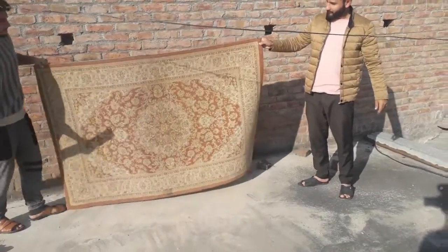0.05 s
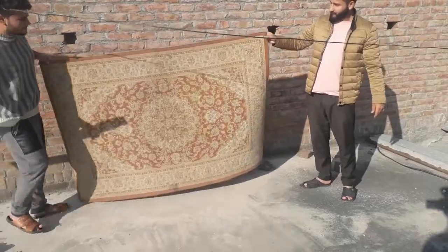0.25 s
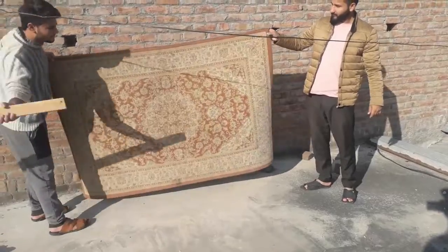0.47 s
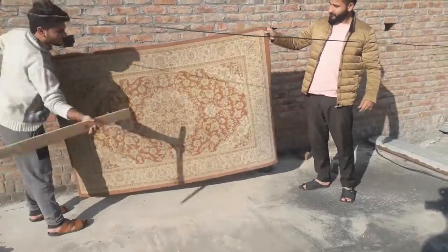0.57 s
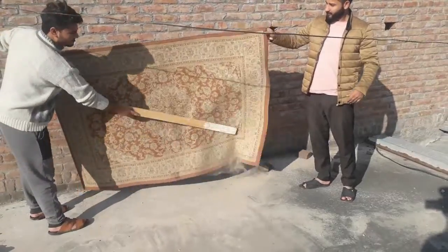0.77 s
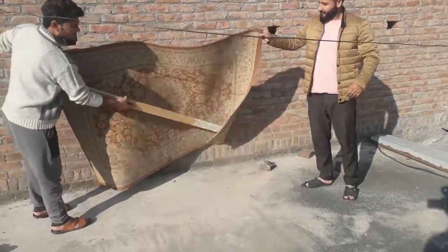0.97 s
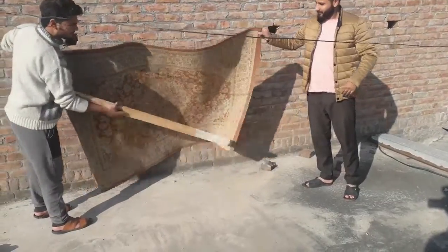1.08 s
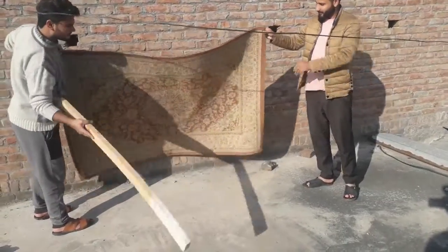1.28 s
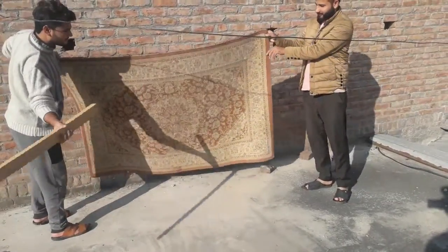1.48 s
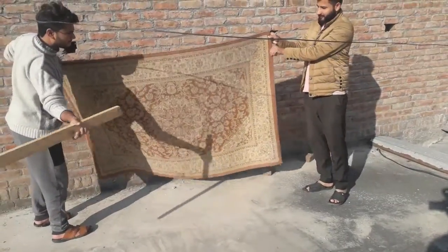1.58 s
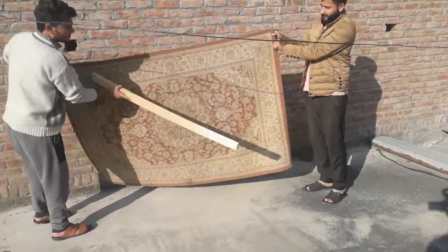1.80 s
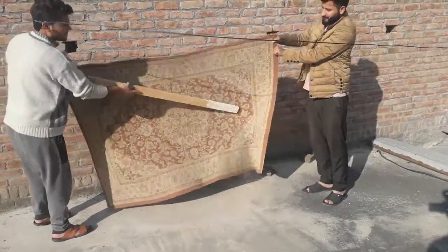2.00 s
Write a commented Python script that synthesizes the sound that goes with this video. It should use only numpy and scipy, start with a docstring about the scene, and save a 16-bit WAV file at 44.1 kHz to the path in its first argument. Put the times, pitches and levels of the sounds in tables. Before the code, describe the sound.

Two heavy, thumping slaps of a bat on a rug echo briefly in a yard.

```python
"""Two loud slaps, each on a dull thump: a wooden bat beats a hanging rug in a brick-walled yard.
Just before each blow a sandal scuffs and the bat swishes through the air, very faintly the second time.
The harder first blow sets the rug's folds clapping. Ground and walls throw each blow back and the yard
booms low. In between, rug and clothes rustle over quiet air. A limiter trims the loudest peaks."""
import sys
import numpy as np
from scipy import signal
from scipy.fft import rfft, irfft, next_fast_len
from scipy.io import wavfile
from scipy.ndimage import uniform_filter1d, minimum_filter1d, map_coordinates

SR = 44100
rng = np.random.default_rng(int(sys.argv[2]) if len(sys.argv) > 2 else 0)


def output_pcm(signal):
    """Save a mono or channel-first signal as 16-bit PCM at the path in sys.argv[1].

    Samples are clipped to [-1, 1] before scaling.
    """
    pcm = np.clip(np.atleast_2d(signal).T, -1, 1) * 32767
    wavfile.write(sys.argv[1], SR, np.round(pcm).astype(np.int16))


N = 90404
T = np.arange(N) / SR


def amp(db):
    """Turn decibels into a number to multiply by."""
    return 10 ** (np.asarray(db) / 20)


def along(points, hz):
    """Read the value at hz from (frequency, value) points, on a log frequency axis."""
    freqs, values = np.transpose(points)
    return np.interp(np.log(hz + 1), np.log(freqs + 1), values)


def filtered(x, gain):
    """Turn each frequency in x up or down by gain(hz)."""
    size = next_fast_len(N + 8192)
    return irfft(rfft(x, size) * gain(np.fft.rfftfreq(size, 1 / SR)), size)[:N]


def noise(colour, tilt_db=0):
    """Noise of average power 1, shaped by a colour table and tilted by tilt_db per octave."""
    white = rng.standard_normal(N)
    shaped = filtered(white, lambda hz: amp(along(colour, hz) + tilt_db * np.log2(hz + 20)))
    return shaped / np.sqrt(np.mean(shaped ** 2) + 1e-20)


def wobble(rate):
    """A smooth curve through `rate` random points a second."""
    points = rng.standard_normal(int(N * rate / SR) + 4)
    return map_coordinates(points, [np.arange(N) * rate / SR])


def fade(t, fade_s):
    """Stay at 1 until t = 0, then drop 60 dB every fade_s seconds."""
    return np.exp(-np.log(1000) * np.maximum(t, 0) / fade_s)


def swell(peak_s, rise_s, fade_s):
    """A level that grows until peak_s and then dies away."""
    return np.exp(np.minimum(T - peak_s, 0) / rise_s) * fade(T - peak_s, fade_s)


def delayed(x, delay_s):
    """The same sound, delay_s seconds later."""
    return np.pad(x, (max(round(delay_s * SR), 0), 0))[:N]


def ringing(tones):
    """Add up pure tones that each die away at their own speed."""
    return sum(amp(db) * np.sin(2 * np.pi * hz * T) * fade(T, fade_s) for hz, db, fade_s in tones)


def far_tone():
    """A faint, wavering tone far away sinks in pitch and fades."""
    # the tone's path: time_s, pitch_hz, level_db
    path = [(0, 913, -48.5), (.1, 897, -55.5), (.6, 901.5, -64.5), (.74, 871, -65), (.85, 860, -87.5)]
    times, hz, db = np.transpose(path)
    pitch = np.interp(T, times, hz) * (1 + .012 * wobble(56))
    level = amp(np.interp(T, times, db) + 2 * wobble(25))
    return level * np.sin(2 * np.pi * np.cumsum(pitch) / SR)


def air(hush_db=-60.5):
    """A steady outdoor hush, with low puffs where stirred air hits the microphone."""
    # colour of the hush: frequency_hz, level_db
    hush_colour = [(25, -6.5), (50, -4), (90, -2), (200, -7.5), (600, -12.5), (1500, -17), (3300, -20.5),
                   (5000, -25), (8000, -37), (10500, -44), (16000, -46.5)]
    # puffs of air: peak_s, level_db, fade_s
    puffs = [(.03, -49, .3), (.09, -41.5, 0.23), (.70, -45, 0.14)]
    # colour of a puff: frequency_hz, level_db
    puff_colour = [(25, -5), (60, -1.5), (100, -4.5), (250, -28), (1000, -57.5)]
    puff_level = sum(amp(db) * swell(peak_s, 0.027, fade_s) for peak_s, db, fade_s in puffs)
    return amp(hush_db) * noise(hush_colour) + puff_level * noise(puff_colour)


def rustles(grain_db=1.0):
    """Clothes and the rug's fibres rub with a grainy hiss."""
    # rubs: start_s, length_s, level_db, edge_s (how softly each begins and ends)
    rubs = [(-.05, 0.16, -48.5, .03), (0.434, 0.024, -44.5, 0.0058), (0.547, .008, -54, 0.012),
            (.47, 0.24, -61, 0.072), (0.814, .29, -59, 0.0091), (1.654, 0.17, -57.5, 0.14),
            (2.045, .05, -58, 0.0088)]
    # colour of rubbing cloth: frequency_hz, level_db
    colour = [(100, 8), (600, -1), (1300, -2.5), (2200, -2.5), (3600, -1), (5500, -9.5), (8000, -11.5),
              (10500, -22.5), (16000, -39)]
    level = np.zeros(N)
    for start_s, length_s, db, edge_s in rubs:
        outside_s = np.maximum(np.abs(T - start_s - length_s / 2) - length_s / 2, 0)
        level += amp(db) * np.exp(-outside_s / edge_s)
    return level * noise(colour) * amp(grain_db * wobble(520))


def rug_flaps():
    """The swinging rug flaps softly between the blows."""
    # flaps: peak_s, level_db, fade_s
    flaps = [(0.81, -52.5, .3), (.85, -61.5, 0.41), (0.887, -53, 0.42), (1.038, -53, 0.224)]
    # colour of a flap: frequency_hz, level_db
    colour = [(25, -47), (100, -28), (200, -4.5), (290, 7.5), (440, -1.5), (700, -8), (1500, -32),
              (5000, -54.5)]
    return noise(colour) * sum(amp(db) * swell(peak_s, 0.0053, fade_s) for peak_s, db, fade_s in flaps)


def sandal_scuffs(grit_db=2, rise_s=0.0024):
    """A sole slides on gritty ground as the weight shifts before a blow."""
    # slides: start_s, level_db, length_s, fade_s
    slides = [(0.147, -26, 0.0088, 0.055), (1.233, -37.5, 0.025, .12)]
    # colour of a scuff: frequency_hz, level_db
    colour = [(40, -3), (130, 5), (280, -3.5), (520, 3), (800, -6), (1050, -3), (1400, -1.5), (1900, -13.5),
              (3200, -18), (5000, -20), (8000, -26.5), (10500, -37), (16000, -45.5)]
    level = sum(amp(db) * np.clip((T - start_s) / rise_s, 0, 1) * fade(T - start_s - length_s, fade_s)
                for start_s, db, length_s, fade_s in slides)
    return level * noise(colour) * amp(grit_db * wobble(500))


def bat_swishes(rough_db=2):
    """The bat brushes through air and cloth just before each blow."""
    # swings: peak_s, level_db, rise_s, fade_s
    swings = [(0.179, -33, 0.069, 0.28), (1.31, -65.5, 0.054, 0.046)]
    # colour of a swish: frequency_hz, level_db
    colour = [(40, -8.5), (130, 1.5), (400, -1.5), (800, -6), (1400, -12), (2200, -19), (5000, -25.5),
              (8000, -32.5), (10500, -41), (16000, -54)]
    level = sum(amp(db) * swell(peak_s, rise_s, fade_s) for peak_s, db, rise_s, fade_s in swings)
    return level * noise(colour) * amp(rough_db * wobble(150))


def fold_claps(rise_s=.0012):
    """The rug's folds clap dully as the hard first blow wraps them round the bat."""
    # claps: peak_s, level_db, tilt_db_per_octave, fade_s
    claps = [(.2290, -13.5, 3.5, 0.031), (0.2544, -4.5, -2, 0.044), (0.2629, -3.5, -1.5, 0.064),
             (.2700, -8.5, -0.5, 0.062), (0.2883, -7.5, -1.5, .035), (0.3066, -9, -2, 0.053),
             (0.3582, -16, -2, 0.032)]
    # colour of a clap: frequency_hz, level_db
    colour = [(40, -20.5), (140, -1), (220, -8.5), (310, 6), (480, -10), (700, -5), (1000, -8),
              (1900, -20.5), (4000, -31), (8000, -42.5), (10500, -63.5), (16000, -85)]
    return sum(amp(db) * noise(colour, tilt_db) * swell(peak_s, rise_s, fade_s)
               for peak_s, db, tilt_db, fade_s in claps)


def yard_boom(rise_s=0.0092):
    """The air between the walls rings on at its own low pitches after a blow."""
    # the yard's tones: pitch_hz, level_db, fade_s
    tones = [(87, -26, 1), (100.8, -16.5, 0.83), (146.6, -15.5, .4), (204, -20.5, 0.47), (277, -30, 0.1),
             (351.5, -17, 0.56), (377, -33.5, 0.11), (604, -32.5, .28)]
    return (1 - np.exp(-T / rise_s)) * ringing(tones)


def yard_tail(body_db, hold_s, body_hz=380, flutter_db=2, rise_s=0.0067):
    """Many scattered echoes blur together: they build up, hold and die, the highest first."""
    # colour of the blurred echoes: frequency_hz, level_db
    colour = [(30, -21), (60, -8), (110, 7.5), (180, 3), (340, 2.5), (470, -8), (900, -13.5), (1900, -18),
              (3500, -26), (5500, -37), (8000, -44), (10000, -56.5), (16000, -76.5)]
    # how long the yard rings: frequency_hz, fade_s
    fade_times = [(60, 0.49), (150, 0.38), (400, 0.49), (1000, 0.4), (3000, 0.43), (9000, 0.29)]
    hz, t, bands = signal.stft(noise(colour), SR, nperseg=512)
    body = amp(body_db * np.exp(-np.log2((hz + 1) / body_hz) ** 2 / 2))[:, None]  # a broad boost
    decay = fade(t - hold_s, along(fade_times, hz)[:, None])
    tail = signal.istft(bands * body * decay, SR, nperseg=512)[1][:N]
    return tail * (1 - np.exp(-T / rise_s)) * amp(flutter_db * wobble(130))


def yard_echoes(hit):
    """The ground, then the brick walls, throw the hit back, later and duller."""
    # echoes: delay_s, level_db
    bounces = [(.0056, -10.5), (0.029, -14.5), (0.0487, -11.5), (0.0626, -15), (0.1, -18.5), (.1500, -29)]
    # how a bounce colours the sound: frequency_hz, gain_db
    colour = [(100, 0), (400, 0.5), (1500, 2.5), (4000, -8), (8000, -28.5), (12000, -19)]
    echoes = sum(amp(db) * delayed(bat_hit(*hit), delay_s) for delay_s, db in bounces)
    return filtered(echoes, lambda hz: amp(along(colour, hz)))


def touch_click(width_s=.00007, gain_db=6):
    """One sharp swing of air pressure as the flat of the bat first touches."""
    widths = T / width_s - 6  # centred six widths in, so it starts from silence
    return amp(gain_db) * widths * np.exp(-widths ** 2 / 2)


def bat_hit(thump_db, knock_db, slap_db, tilt_db, rise_s=.0003):
    """The rug's face shoves the air (thump), the wood rings briefly (knock) and the fibres slap."""
    # the rug's thump: pitch_hz, fade_s
    thump_tone = (150, .065)
    # the bat's tones, damped by the rug: pitch_hz, level_db, fade_s
    bat_tones = [(349.8, -3.5, .055), (575.5, -12.5, .03), (917, -19, 0.021)]
    # colour of the slap: frequency_hz, level_db
    slap_colour = [(200, -2.5), (550, 3), (900, 1), (1400, -0.5), (2000, 0.5), (2600, -6), (3400, -5.5),
                   (4600, -5.5), (6000, -16), (7500, -12.5), (8500, -22.5), (9800, -29), (16000, -38.5)]
    thump_hz, thump_fade_s = thump_tone
    thump = amp(thump_db - 5.5) * np.sin(2 * np.pi * thump_hz * T) * fade(T, thump_fade_s)
    knock = amp(knock_db - 4) * ringing(bat_tones)
    crack_level = amp(0.5) * fade(T, fade_s=.003)
    slap_level = fade(T - 0.0021, fade_s=0.038)  # holds for a moment first
    slap = amp(slap_db - 5) * noise(slap_colour, tilt_db) * (slap_level + crack_level)
    rise = 1 - np.exp(-(T / rise_s) ** 2)
    return rise * (slap - thump - knock)


def rug_beating():
    """The bat lands twice, and the yard answers each blow with echoes, a tail and a boom."""
    # blows, with a gain for each part: start_s, thump_db, knock_db, slap_db,
    # tilt_db_per_octave (of the slap), tail_db, body_db (of the tail), boom_db, hold_s (of the tail)
    blows = [(0.2070, 5.5, 2.5, -3.5, -0.5, -13.5, 5.5, -4, 0.08),
             (1.3206, -2, 1, -2.5, -1.7, -17, 0.5, -2, 0.038)]
    out = np.zeros(N)
    for start_s, thump_db, knock_db, slap_db, tilt_db, tail_db, body_db, boom_db, hold_s in blows:
        hit = thump_db, knock_db, slap_db, tilt_db
        direct = bat_hit(*hit) + amp(slap_db) * touch_click()
        echoes = yard_echoes(hit)
        tail = amp(tail_db) * yard_tail(body_db, hold_s)
        boom = amp(boom_db) * yard_boom()
        out += delayed(direct + echoes + tail + boom, start_s)
    return out


def scene():
    """Add up all the sounds at one microphone."""
    blows = rug_beating() + fold_claps()
    movement = sandal_scuffs() + bat_swishes() + rustles() + rug_flaps()
    background = far_tone() + air()
    return (blows + movement + background)[None]


def record(dry, low_cut_hz=58, limit_db=-1.3, hold_s=.002, top_hz=16300):
    """The microphone loses deep bass and some treble, a limiter trims peaks, and the very top is cut."""
    # the microphone's dull treble: frequency_hz, gain_db
    mic_colour = [(7800, -1), (10000, -3.5), (16000, -4)]
    low_cut = signal.butter(N=2, Wn=low_cut_hz, btype="high", fs=SR, output="sos")
    sound = signal.sosfilt(low_cut, dry[0])
    sound = filtered(sound, lambda hz: amp(along(mic_colour, hz)))
    window = int(hold_s * SR)
    needed_gain = np.minimum(1, amp(limit_db) / (np.abs(sound) + 1e-9))
    gain = uniform_filter1d(minimum_filter1d(needed_gain, window), window)  # dips just ahead of a peak
    return filtered(sound * gain, lambda hz: hz < top_hz)[None]


dry = scene()
out = record(dry)
output_pcm(out)
```